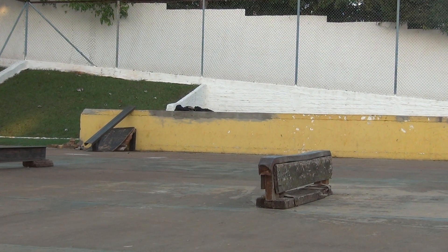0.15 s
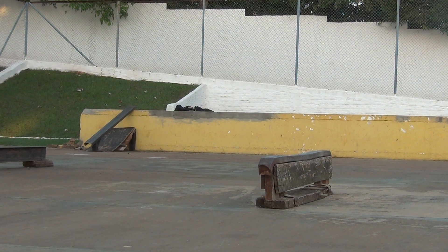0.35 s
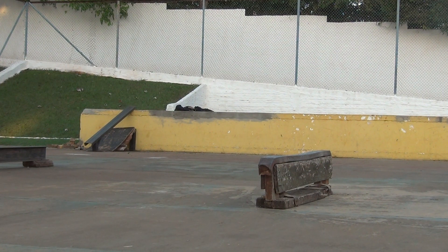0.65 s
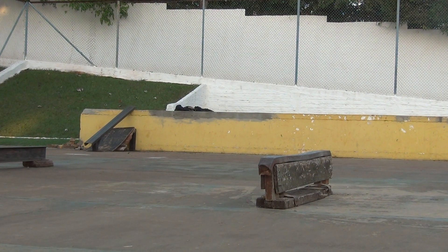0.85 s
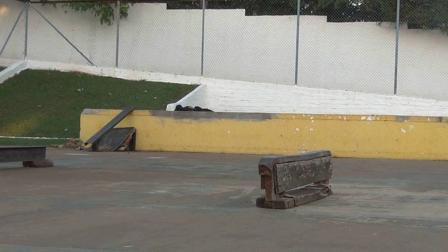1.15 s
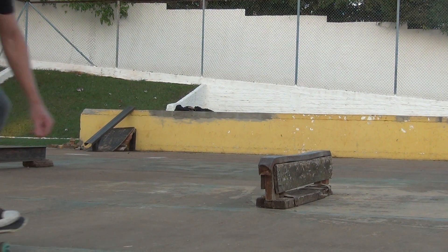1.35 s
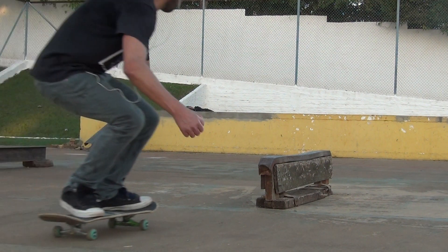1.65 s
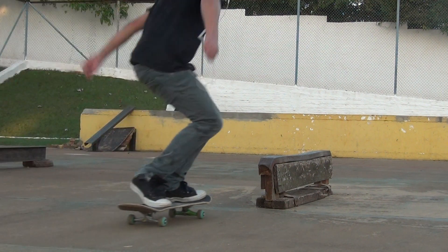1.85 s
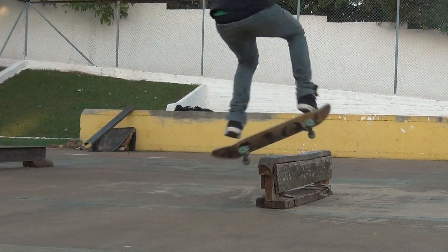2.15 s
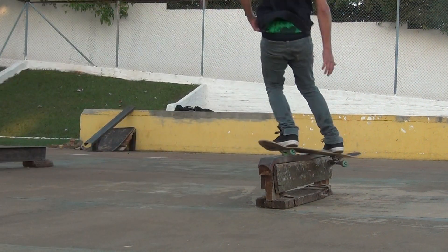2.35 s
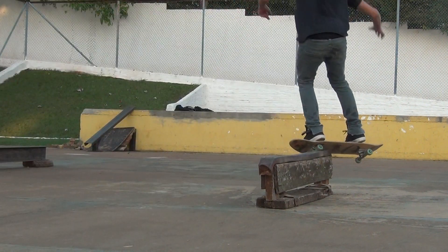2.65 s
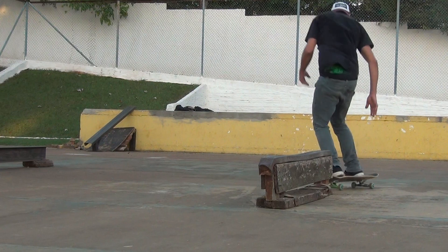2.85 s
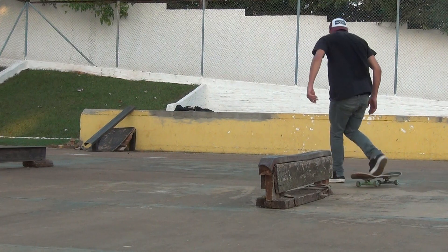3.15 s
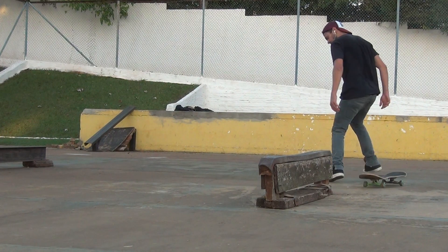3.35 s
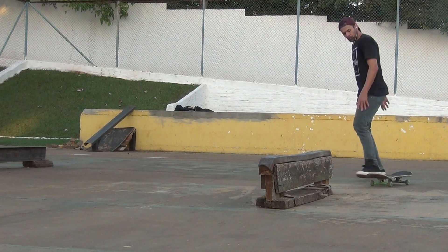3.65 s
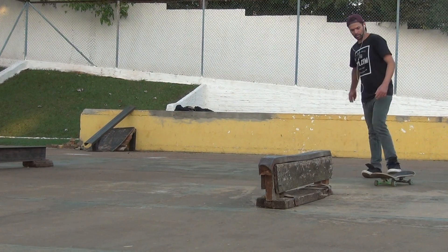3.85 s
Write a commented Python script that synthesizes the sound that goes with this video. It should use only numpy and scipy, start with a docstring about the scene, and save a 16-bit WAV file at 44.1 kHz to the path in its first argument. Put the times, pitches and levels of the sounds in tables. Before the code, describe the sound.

A skateboard rumbles over rough concrete from the left, pops sharply, scrapes along a low block and lands with a hard clatter; small knocks follow in an open walled yard, with a faint distant engine.

```python
"""Skateboard wheels come rolling over rough concrete, left of centre; the board pops, slides along a low block
and lands with a clatter; the rider steps off and the board trickles on. Far away an engine drones down
through a gear change, over the air of a distant town. Wheels and slide are random clicks shaped by spectra;
knocks are noise bursts and ringing deck modes; thuds, sole and engine are sines; the yard is a noise tail."""
import sys
import numpy as np
from scipy import signal
from scipy.fft import rfft, irfft
from scipy.io import wavfile
from scipy.ndimage import uniform_filter1d

SR = 44100
rng = np.random.default_rng(int(sys.argv[2]) if len(sys.argv) > 2 else 0)


def persist_wave(psi):
    """Save psi, clipped to +-1, as 16-bit WAV."""
    counts = np.round(np.clip(psi, -1, 1) * 32767).astype(np.int16)
    wavfile.write(sys.argv[1], SR, np.atleast_2d(counts).T)


N = 176400
T = np.arange(N) / SR

# how near the wheels sound: start_s, close_share (0 far to 1 close)
NEARNESS = [(1.05, 0.08), (1.4, 1), (3.5, 1), (3.6, 0)]


def amp(db):
    """dB to gain."""
    return 10 ** (np.asarray(db) / 20)


def rms_one(x):
    """Scale to rms 1."""
    return x / np.sqrt(np.mean(x ** 2) + 1e-20)


def in_time(rows):
    """Columns of a time table, one value per sample."""
    s, *columns = np.transpose(rows)
    return [np.interp(T, s, c) for c in columns]


def gate(rows, fade_s=0.01):
    """1 while the table runs, 0 outside, with a short fade at each end."""
    since_start = T - rows[0][0] + fade_s
    until_end = rows[-1][0] - T + fade_s
    return np.clip(np.minimum(since_start, until_end) / fade_s, 0, 1)


def drift(corner_hz):
    """Slow random wander with spread 1: noise through two equal poles at a 20th of the sample rate."""
    r = np.exp(-40 * np.pi * corner_hz / SR)
    noise = rng.standard_normal(N // 20 + 1002)
    slow = signal.lfilter([1], [1, -2 * r, r * r], noise)[1000:]  # drop the settling
    return np.interp(np.arange(N) / 20, np.arange(len(slow)), rms_one(slow))


def band(x, low_hz, high_hz):
    """Butterworth band-pass."""
    return signal.sosfilt(signal.butter(2, [low_hz, high_hz], "band", fs=SR, output="sos"), x)


def ring(x, hz, t60_s):
    """Two-pole resonator: a unit click starts a dying sine of initial height 1."""
    r, w = amp(-60 / (t60_s * SR)), 2 * np.pi * hz / SR
    return signal.lfilter([0, np.sin(w)], [1, -2 * r * np.cos(w), r * r], x + 1e-18)


def colour(x, spectrum):
    """Shape by a spectrum table, interpolated over log frequency; rms 1."""
    hz, db = np.transpose(spectrum)
    f = np.maximum(np.fft.rfftfreq(N, 1 / SR), 1)
    gain = amp(np.interp(np.log(f), np.log(hz), db, left=-70))
    return rms_one(irfft(rfft(x) * gain, N))


def grains(per_s, spread_db):
    """Random clicks of uneven size and sign; rms 1."""
    sizes = amp(spread_db * np.minimum(rng.exponential(1, N), 5)) * rng.choice([-1, 1], N)
    return rms_one(sizes * (rng.random(N) < per_s / SR))


def clicks(s, db):
    """One click per event."""
    out = np.zeros(N)
    out[(np.asarray(s) * SR).astype(int)] = amp(db)
    return out


def burst(s, db, t60_s):
    """Noise that rises within a millisecond at each event and dies away."""
    onsets = uniform_filter1d(clicks(s, db), size=16, origin=7)
    envelope = signal.lfilter([1], [1, -amp(-60 / (t60_s * SR))], onsets + 1e-18)
    return envelope * rng.choice([-1, 1], N)


def swells(rows, octave_db):
    """Short tones with a bell-shaped envelope and an octave."""
    total = np.zeros(N)
    for s, hz, db, length_s in rows:
        bell = np.exp(-.5 * ((T - s) / length_s) ** 2)
        tone = np.sin(2 * np.pi * hz * T) + amp(octave_db) * np.sin(2 * np.pi * 2 * hz * T)
        total += amp(db) * bell * tone
    return total


def rolling():
    """Grit under the wheels shakes the deck: boxy from afar, brighter close by."""
    # wheels on concrete, before the pop and after the landing: start_s, level_db
    runs = [
        [(0, -26), (.25, -28.5), (.4, -21.5), (.72, -23.5), (.9, -26), (1.3, -27.5), (1.65, -26), (1.75, -32),
         (2.03, -31), (2.08, -25.5), (2.2, -47)],
        [(3.0, -27), (3.1, -44), (3.55, -55), (3.68, -47), (4, -65)],
    ]
    # spectra of the roll, far and close: freq_hz, relative_db
    far_spectrum = [(90, -16), (230, -3), (430, -8), (590, 5), (680, -11), (1100, -17), (1900, -23),
                    (4230, -47), (4850, -39), (6000, -60)]
    near_spectrum = [(90, -1), (300, 2), (1070, 6.5), (1970, -20), (3600, -21), (6000, -60)]
    judder_db, judder_hz = 2.0, 15
    grit = grains(per_s=3300, spread_db=3) * amp(judder_db * drift(judder_hz))
    close = np.clip(in_time(NEARNESS)[0], 0, 1)
    rumble = np.sqrt(1 - close) * colour(grit, far_spectrum) + np.sqrt(close) * colour(grit, near_spectrum)
    return rumble * sum(gate(run) * amp(in_time(run)[0]) for run in runs)


def bearings_and_trucks():
    """The bearings hiss as dense fine clicks; close by, loose trucks add sparse ticks."""
    # level of hiss and ticks together: start_s, level_db
    hiss_level = [(0, -67.5), (.8, -57), (1.3, -55.5), (2.15, -59.5)]
    # their spectrum: freq_hz, relative_db
    hiss_spectrum = [(4000, -18), (5600, -8.5), (11700, -15.5), (16000, -18)]
    close = np.clip(in_time(NEARNESS)[0], 0, 1)
    truck_ticks = .8 * close * grains(per_s=45, spread_db=1.5)
    hiss_and_ticks = colour(grains(per_s=6500, spread_db=1.7) + truck_ticks, hiss_spectrum)
    return gate(hiss_level) * amp(in_time(hiss_level)[0]) * hiss_and_ticks


def bumps():
    """Each crack or scuff gives a short rattle of the trucks: band-passed clicks under a smooth hump."""
    # wheels over cracks, scuffs: start_s, rattle_db
    cracks = [(0.374, -29), (0.4, -32), (0.5027, -15), (0.67, -26), (0.7044, -17), (0.747, -23),
              (1.05, -26.5), (1.226, -27.5), (1.3528, -16), (1.3704, -23.5), (1.5823, -22.5), (1.62, -29),
              (1.649, -24.5), (2.0643, -23.5), (3.312, -30.5)]
    bump_s = 0.03
    s, db = np.transpose(cracks)
    rattle = rms_one(band(grains(per_s=5000, spread_db=2.1), 440, 1400))
    return np.convolve(clicks(s, db), signal.windows.hann(int(bump_s * SR)))[:N] * rattle


def sliding():
    """Stick-slip of wood on the block's edge, with coarse grit crushed under it."""
    # deck pressed on the block: start_s, body_db, grit_db
    pressure = [(2.34, -21.5, -38), (2.43, -18, -32), (2.51, -30.5, -44), (2.6, -26.5, -51.5),
                (2.69, -21.5, -40.5), (2.8, -31, -52), (2.88, -48, -51)]
    # spectrum of the slips: freq_hz, relative_db
    slip_spectrum = [(200, -18.5), (600, -3.5), (950, -1.5), (2300, -18), (5500, -37), (16000, -56)]
    body_db, grit_db = in_time(pressure)
    slips = colour(grains(per_s=2900, spread_db=1), slip_spectrum)
    uneven = amp(4.0 * drift(30))
    grit = rms_one(band(grains(per_s=1500, spread_db=2.5) * uneven, 1700, 5000))
    return gate(pressure) * (amp(body_db) * slips + amp(grit_db) * grit)


def knocks():
    """A crack, a quicker treble tick, and deck modes shaken by rough contact, unevenly from blow to blow."""
    # the board is struck: start_s, crack_db, treble_db, body_db (each before its trim below)
    blows = [(1.9923, -22, -35, -22.5), (2.0964, -7.5, -63, -23), (2.1596, -10.5, -56, -23.5),
             (2.3108, -26, -40, -23.5), (2.3398, -32, -30, -15), (2.3569, -23, -21, -9),
             (2.3767, -9, -39, -13), (2.8848, -15, -23, -11.5), (2.9162, -15, -19, -2.5),
             (2.9311, -10, -21, -4.5), (2.9439, -21, -21, -18), (2.9669, -13, -20, -18),
             (2.9792, -9.5, -25, -12.5), (2.9927, -14, -24, -22), (3.2953, -15, -24, -18.5),
             (3.3433, -32, -33, -33), (3.3676, -19, -23, -25), (3.407, -25, -31.5, -33),
             (3.566, -36.5, -44, -37), (3.608, -34, -57, -31.5), (3.6464, -32.5, -60, -55)]
    # modes of the deck: freq_hz
    mode_hz = [430, 580, 760, 1000, 1270, 1850]
    crack_t60_s, tick_t60_s, contact_t60_s, deck_t60_s = .026, .022, .039, .022
    strike_spread_db = 3.5
    s, crack_db, treble_db, body_db = np.transpose(blows)
    crack = band(band(burst(s, crack_db + 2.5, crack_t60_s), 900, 3420), 570, 4100)
    tick = band(burst(s, treble_db - 3, tick_t60_s), 5100, 9400)
    uneven_db = strike_spread_db * rng.standard_normal((len(s), len(mode_hz)))
    deck = np.zeros(N)
    for db, hz in zip(body_db + uneven_db.T, mode_hz):
        contact = burst(s, db - 29.5, contact_t60_s) + clicks(s, db - 18.0)
        deck += ring(contact, hz, deck_t60_s)
    return crack + tick + deck


def thuds():
    """Deck thuds and one short low click: brief tones under a bell."""
    # thuds, and a low click at the end: centre_s, pitch_hz, level_db, length_s (spread of the bell)
    low_tones = [(.55, 132.5, -29.5, 0.028), (1.05, 146.4, -19, 0.015), (1.37, 225, -23.5, 0.023),
                 (1.63, 137.4, -26.5, 0.036), (2.945, 150, -26.5, 0.019), (3.262, 200, -36, 0.0033),
                 (3.53, 554, -25.5, 0.0011)]
    return swells(low_tones, octave_db=-12.0)


def squeak():
    """The shoe sole chirps: a brief tone with a rough, noisy edge."""
    # shoe sole: centre_s, pitch_hz, level_db (before roughening), length_s (spread of the bell)
    chirps = [(3.255, 2280, -27, .0022)]
    return swells(chirps, octave_db=-13.5) * (.9 + .35 * drift(400))


def pan(board):
    """Place the board between left and right by a level difference above the bass."""
    # board position: start_s, left_minus_right_db (approximate)
    position = [(.6, 3.5), (2.1, 0.6)]
    pan_from_hz = 250
    aside = band(board, pan_from_hz, 13500) * (amp(in_time(position)[0] / 2) - 1)
    return board + aside * [[1], [-1]]


def yard(x):
    """Dull diffuse return from the walls, mostly alike in both channels: a dying noise tail."""
    level_db, t60_s, cut_hz, width = -13, 0.72, 12300, 0.43
    t = np.arange(SR) / SR
    # nothing returns for the first 12 ms
    mid, side = rng.standard_normal((2, SR)) * amp(-60 * t / t60_s) * (t > .012)
    mid, side = band(mid, 158, cut_hz), band(side, 1330, cut_hz)
    tail = (mid + width * side * [[1], [-1]]) / np.sqrt(np.sum(mid ** 2))
    return amp(level_db) * signal.fftconvolve(x[None], tail, axes=1)[:, :N]


def engine():
    """Firing tone of a distant engine and its octave, wavering in level."""
    # engine through the gear change: start_s, pitch_hz, level_db (of the firing tone, before it wavers)
    revs = [(0, 88.6, -36), (.42, 96.1, -35.5), (.55, 87.4, -49), (.85, 82.6, -43), (1.25, 71, -55),
            (1.4, 66.8, -38), (2.3, 66.2, -45.5), (2.9, 65.2, -61), (4, 58, -55)]
    octave_db = -8
    hz, db = in_time(revs)
    phase = 2 * np.pi * np.cumsum(hz) / SR
    tone = np.sin(phase) + amp(octave_db) * np.sin(2 * phase)
    return np.sqrt(2) * amp(db + drift(18)) * tone


def town_air():
    """Air of a distant town: steady shaped noise, nearly alike in both channels."""
    # spectrum of the air: freq_hz, relative_db
    air_spectrum = [(40, -5), (150, -7.5), (300, -23), (550, -10.5), (1500, -16.5), (16000, -44)]
    level_db, width = -51.5, 0.099
    mid, side = [colour(rng.standard_normal(N), air_spectrum) for _ in range(2)]
    return amp(level_db) * (mid + width * side * [[1], [-1]])


def scene():
    """Board panned by its position, with yard, engine and air."""
    board = rolling() + bearings_and_trucks() + bumps() + sliding() + knocks() + thuds() + squeak()
    board = band(board, 80, 12600)
    return pan(board) + yard(board) + engine() + town_air()


def record(dry):
    """At the microphone: peaks are rounded, the top is cut steeply."""
    ceiling, cutoff_hz = .45, 16600
    rounded = ceiling * np.tanh(dry / ceiling)
    # the stop band begins just above the cutoff
    top_cut = signal.cheby2(12, 70, cutoff_hz * 1.02, fs=SR, output="sos")
    return signal.sosfilt(top_cut, rounded)


dry = scene()
out = record(dry)
persist_wave(out)
```